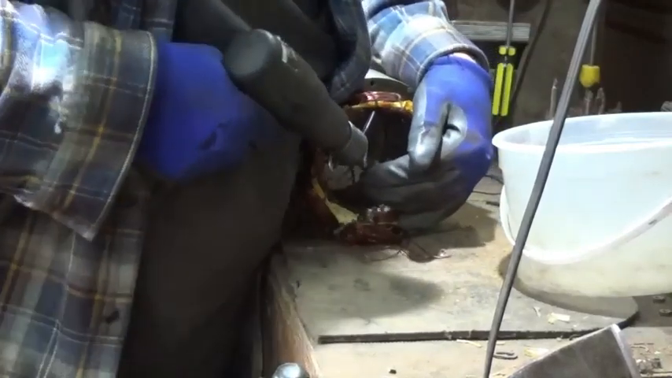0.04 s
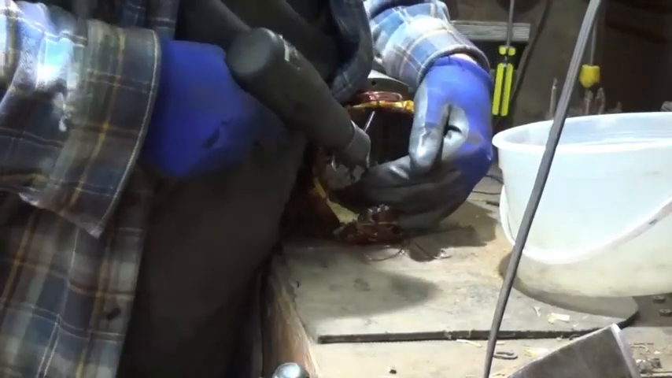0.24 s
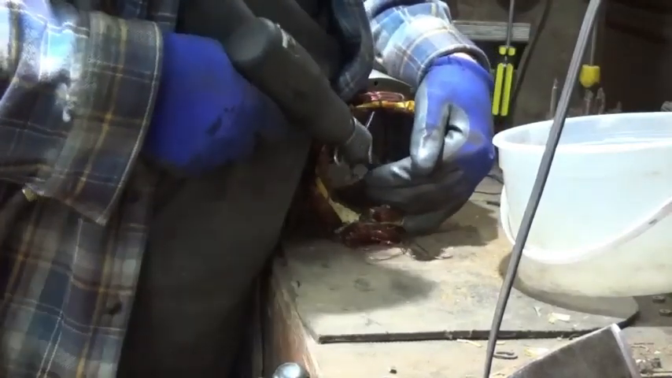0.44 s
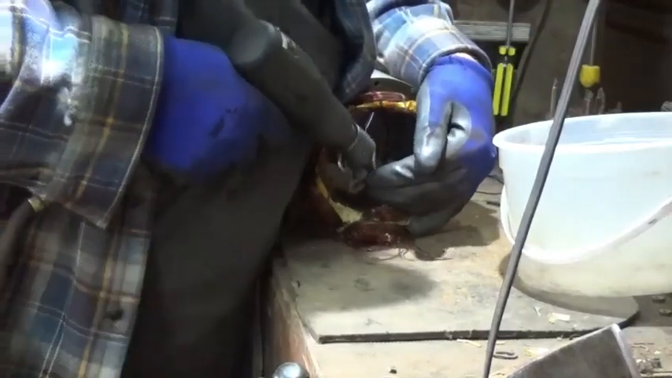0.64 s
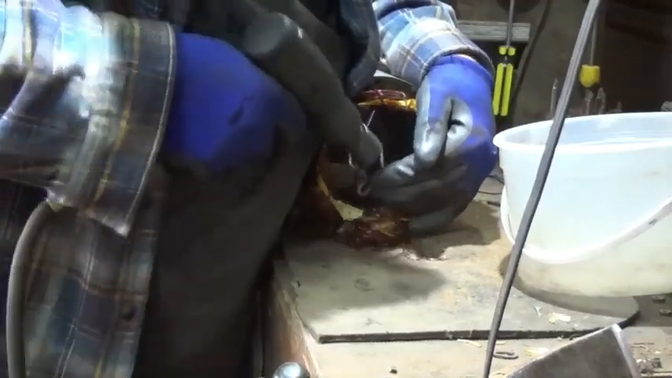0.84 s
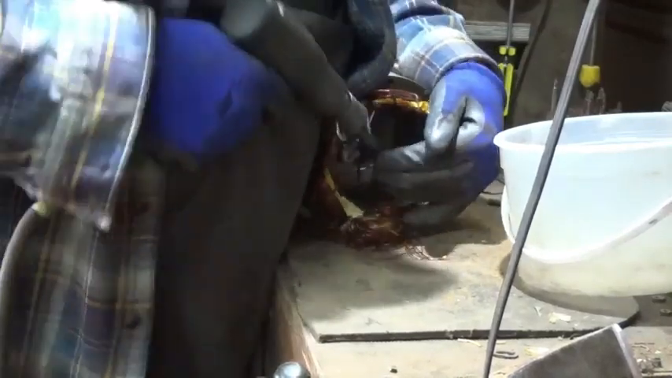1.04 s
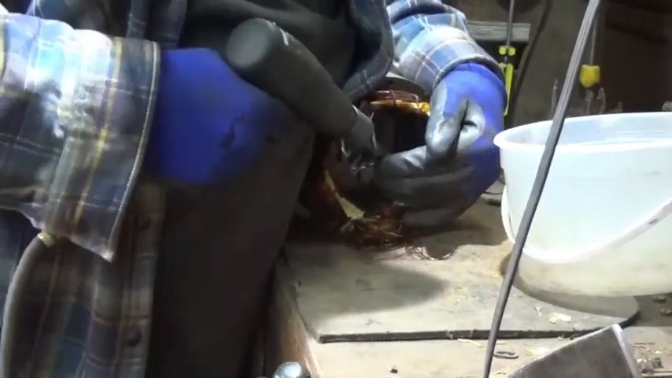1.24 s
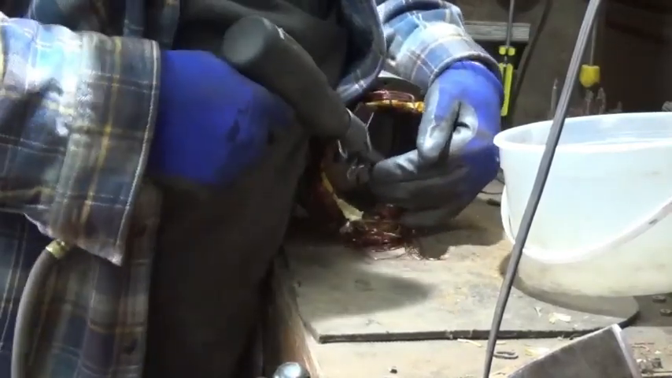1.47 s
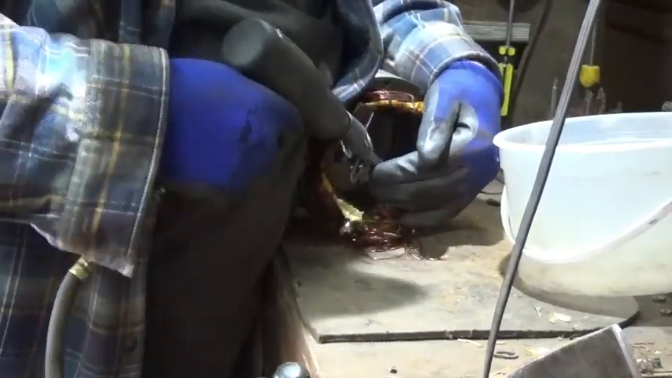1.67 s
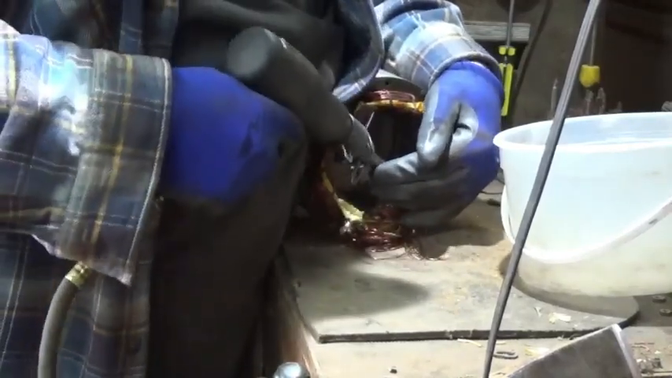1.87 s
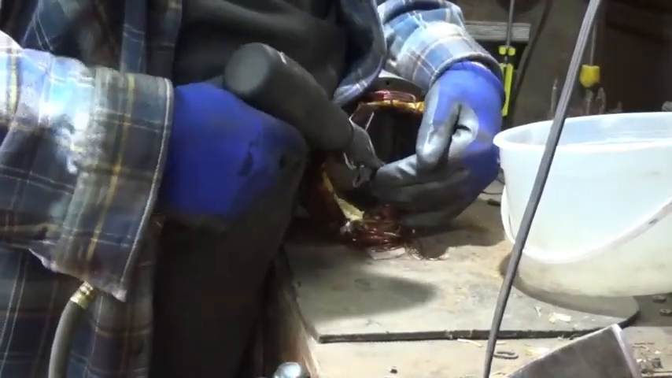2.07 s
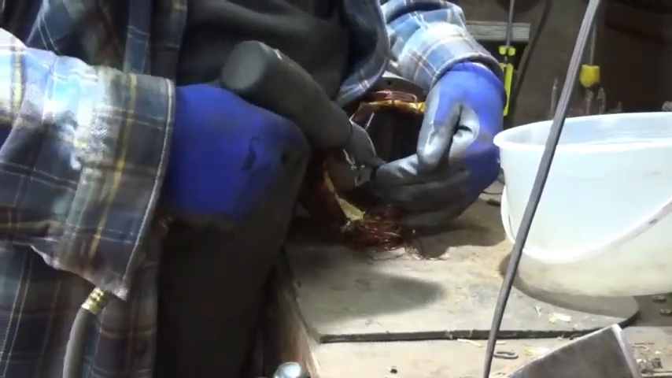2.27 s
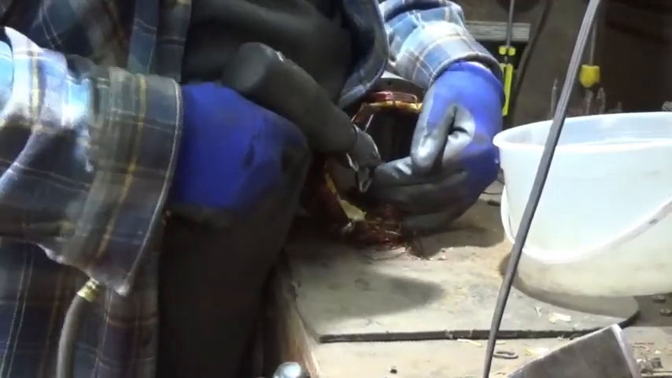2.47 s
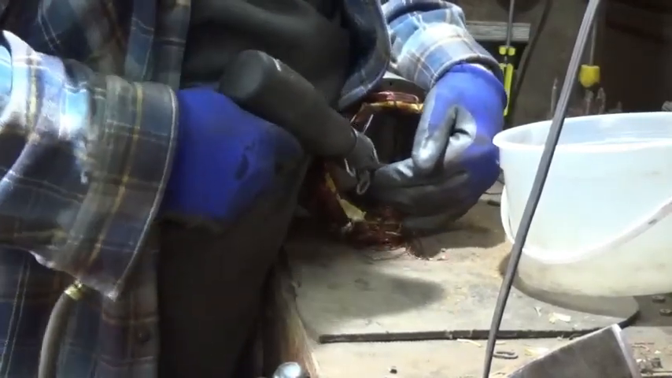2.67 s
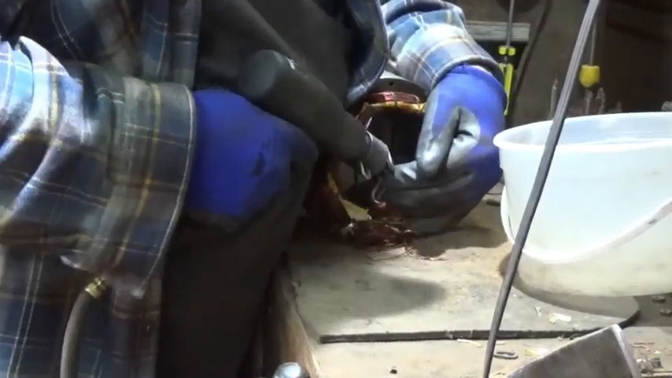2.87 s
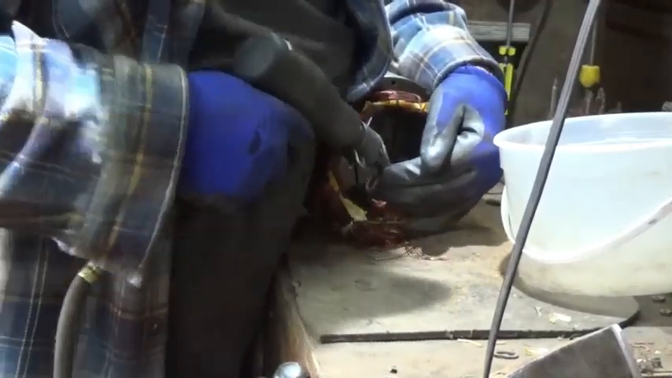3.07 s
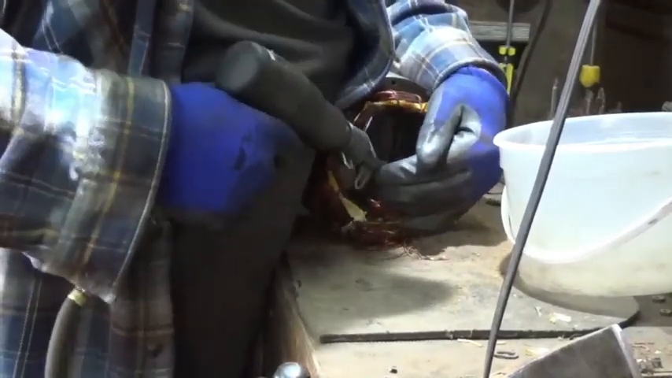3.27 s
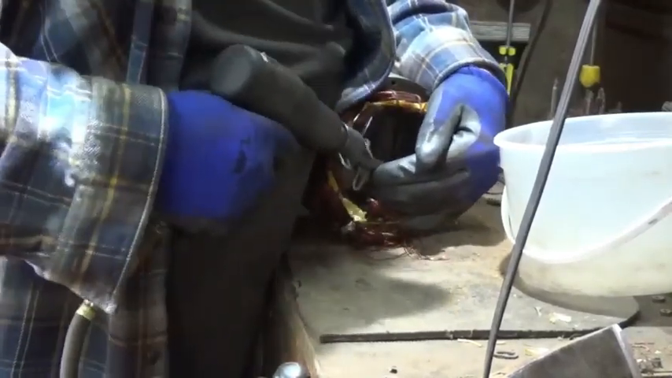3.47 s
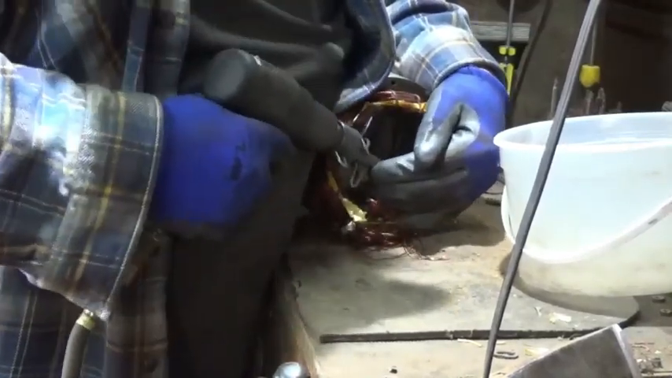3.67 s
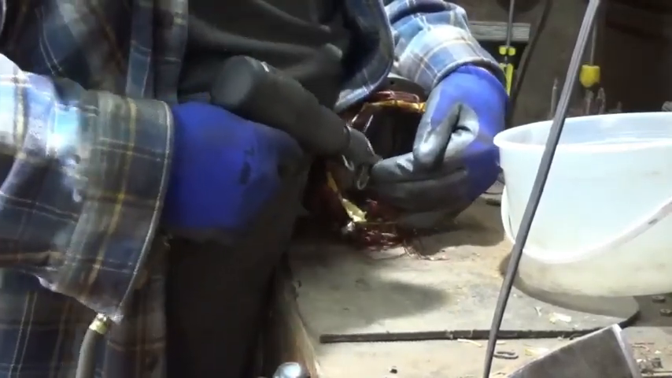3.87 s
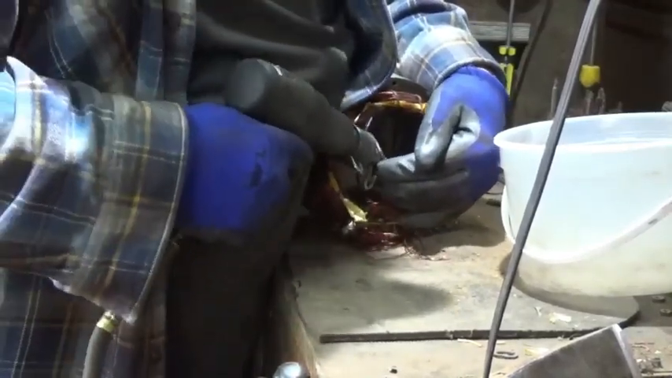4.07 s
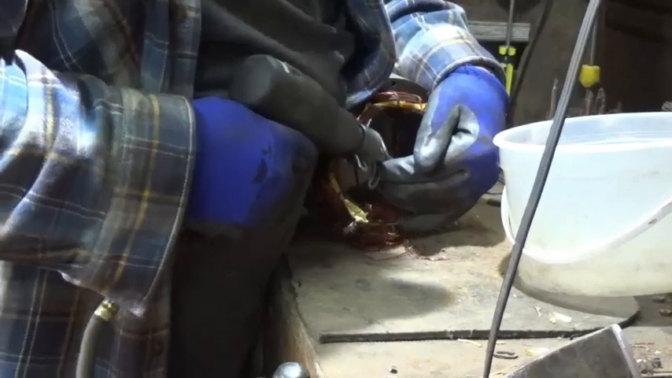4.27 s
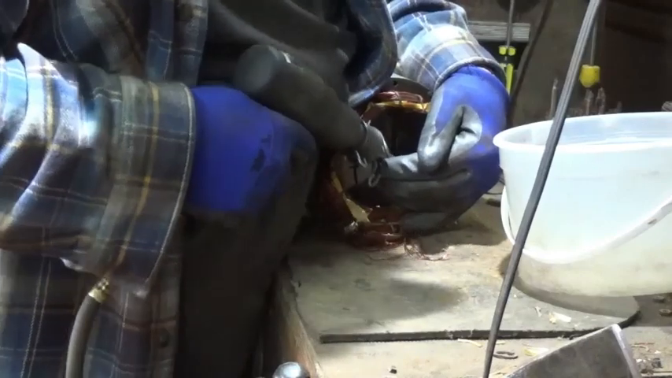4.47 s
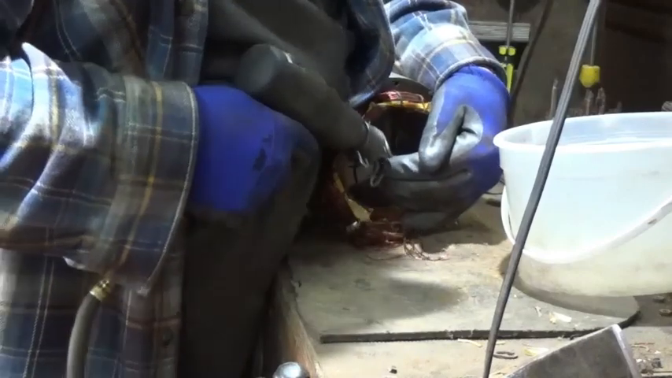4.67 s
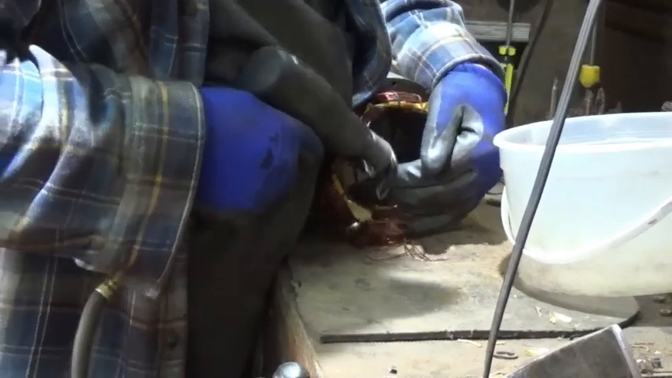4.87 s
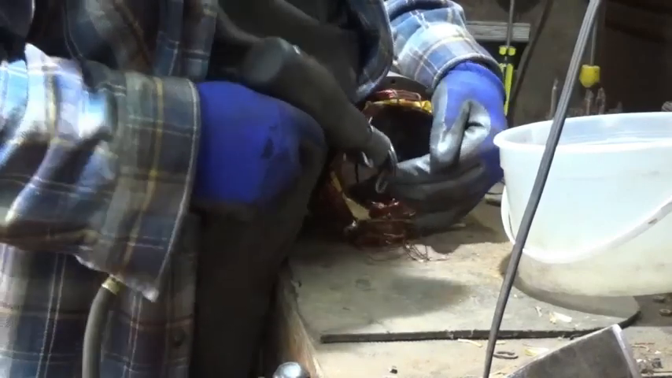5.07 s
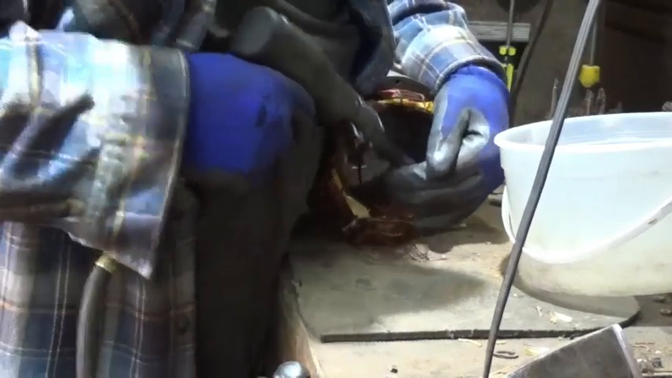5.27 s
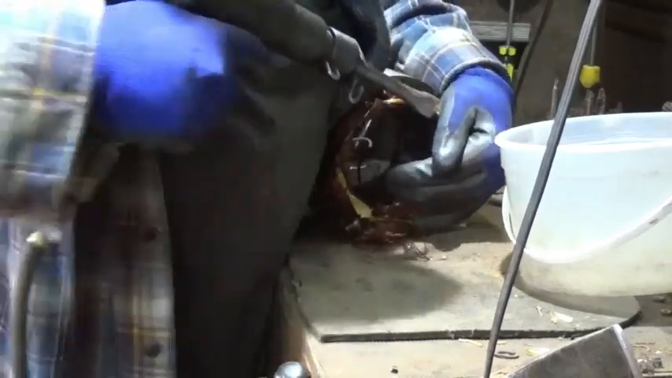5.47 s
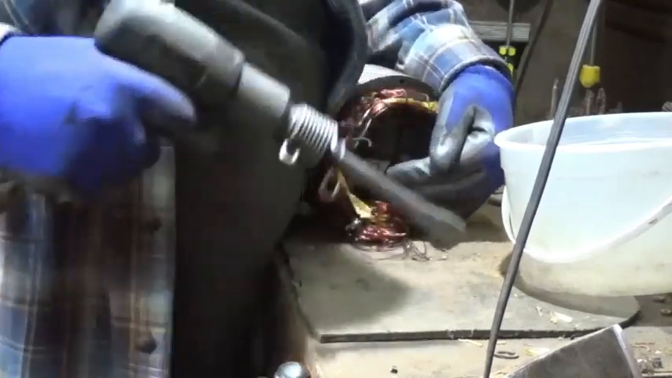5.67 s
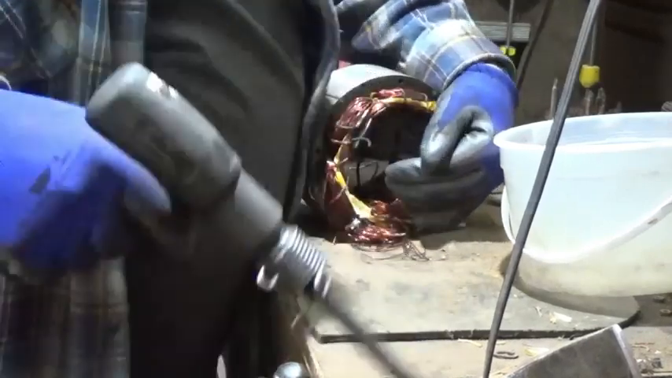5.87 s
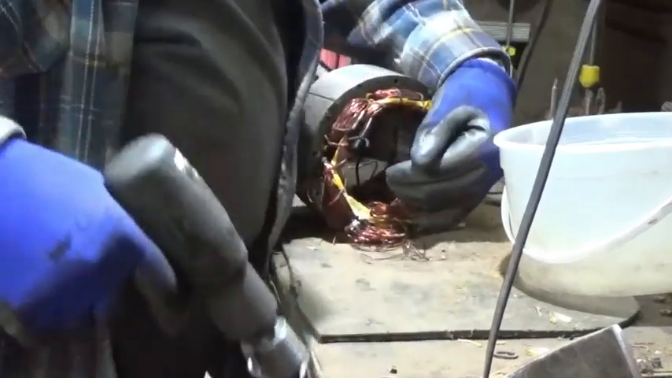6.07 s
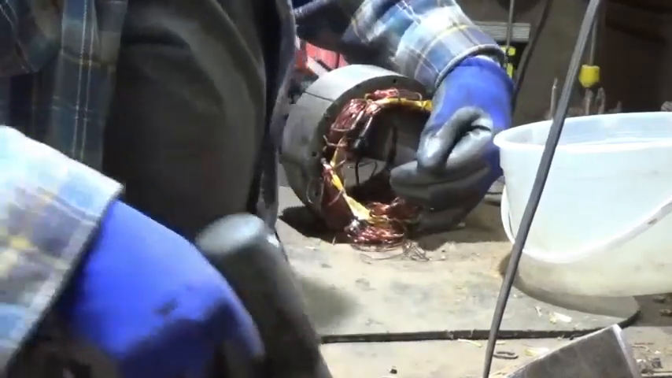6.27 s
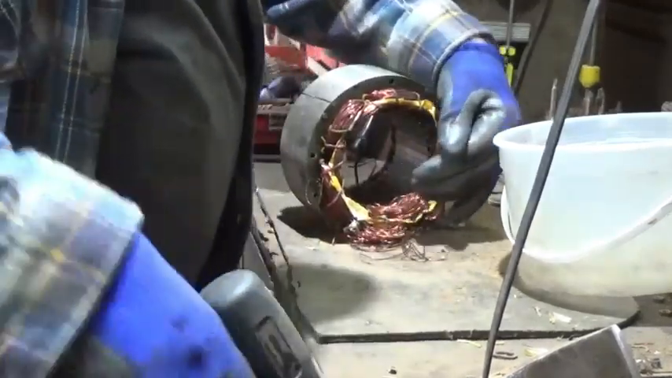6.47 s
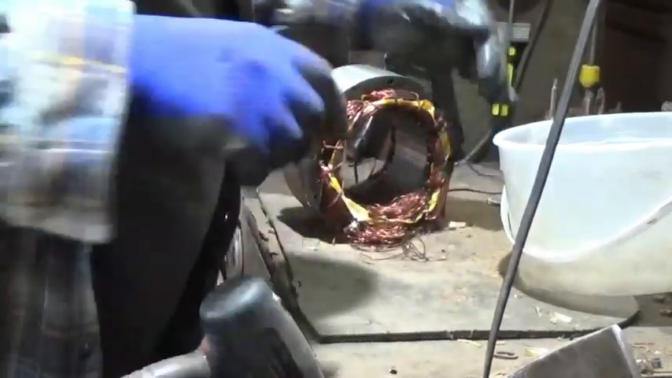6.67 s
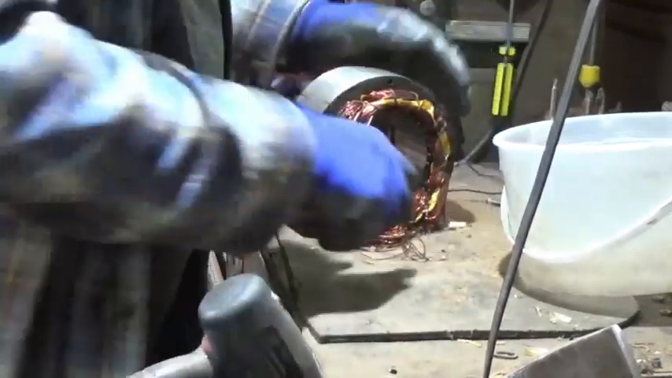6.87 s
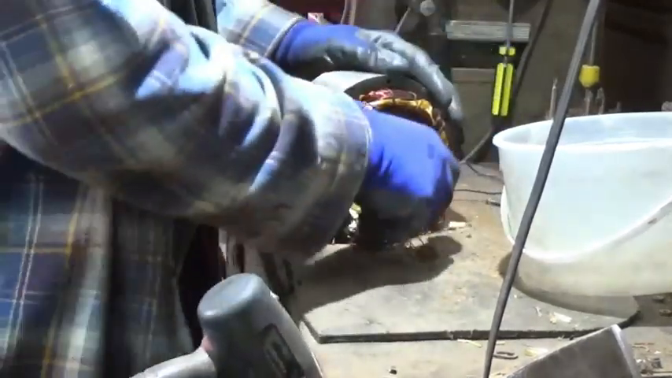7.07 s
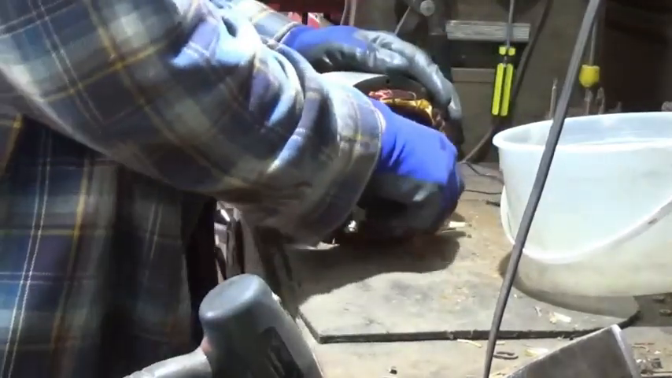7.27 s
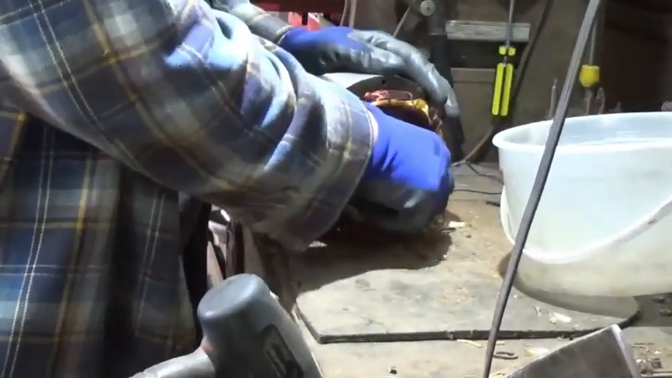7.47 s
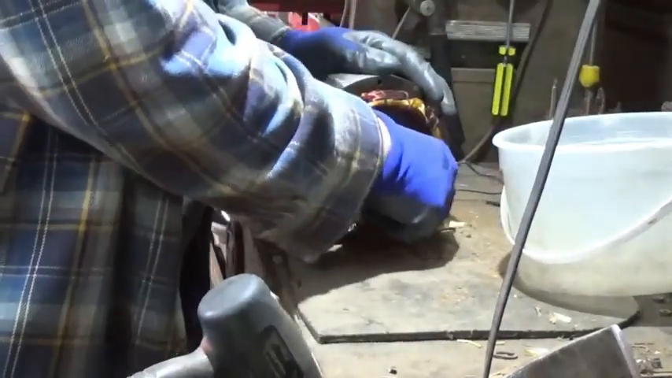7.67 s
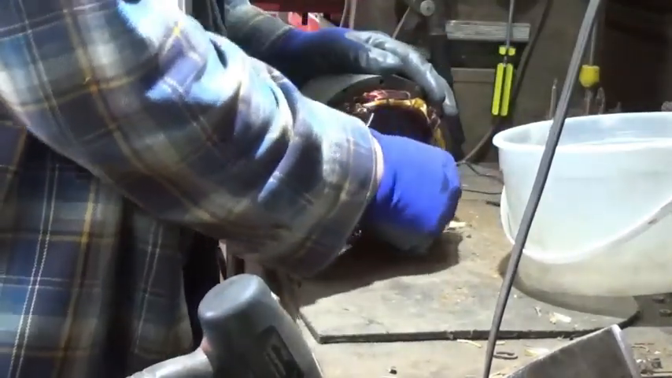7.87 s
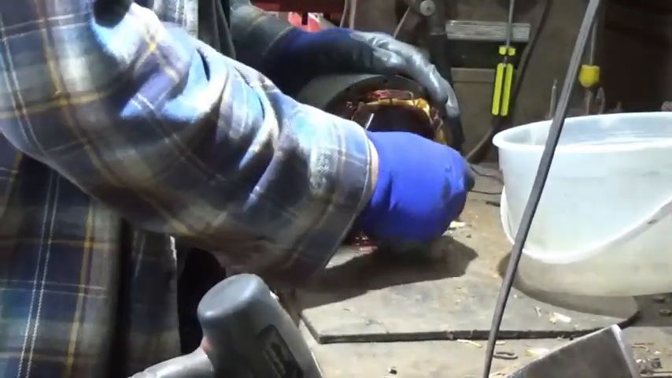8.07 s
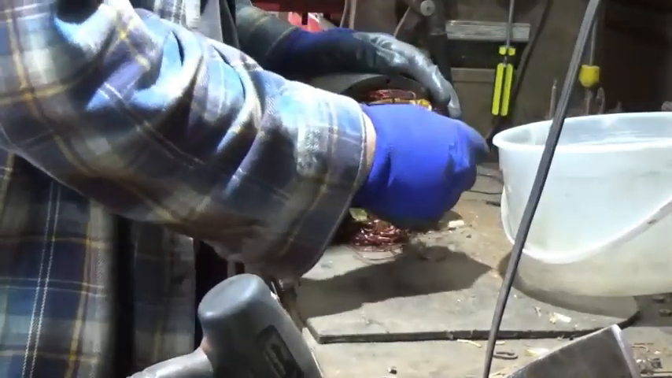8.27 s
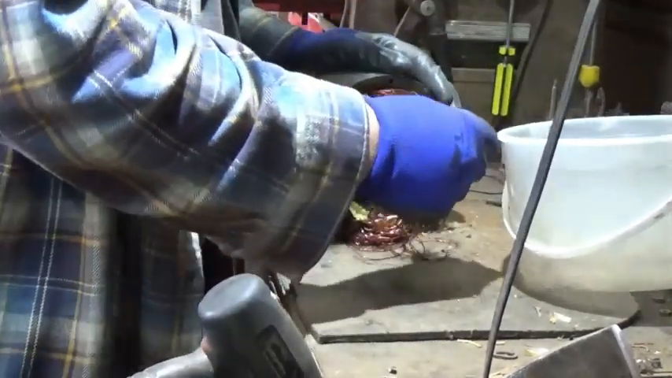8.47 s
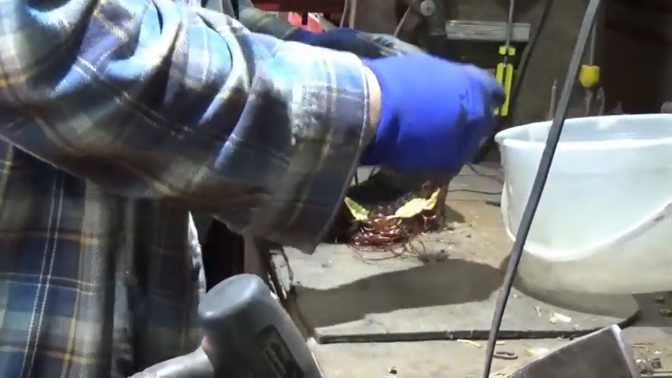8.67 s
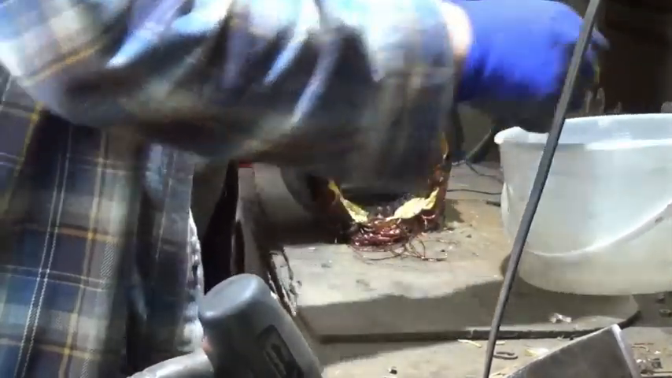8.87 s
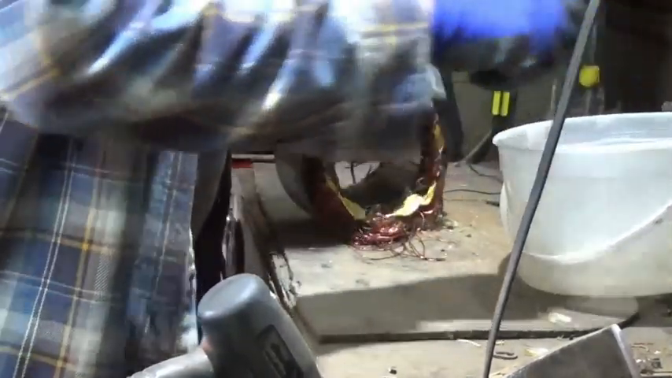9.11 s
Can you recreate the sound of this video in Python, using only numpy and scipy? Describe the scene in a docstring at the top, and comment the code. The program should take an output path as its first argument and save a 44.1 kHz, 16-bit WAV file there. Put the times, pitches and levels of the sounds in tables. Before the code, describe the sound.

An air compressor chugs rapidly in the background of a small workshop throughout, with a thin whistle, slowing very slightly. Close by, an air chisel hammers into an electric motor's copper windings, each burst a fast, ringing metallic rattle with hissing air. A blip at the very start is followed by a half-second burst from 0.2 seconds. Short bursts come at 2.7 and 4.2 seconds, and a longer, more ringing one from 4.5 to 5. Light metal ticks and jingles fall between them, the clearest at 2.3 seconds. From 6.1 to 6.4 seconds the tool is set on a wooden bench with knocks, a scrape and thuds. Wire scratches faintly as it is pulled from 7 seconds, and copper scrap lands with a light clatter at about 9. The compressor dips at each loud sound and creeps back, seeming to swell toward the end.

```python
"""Air chisel at a workbench

An air chisel cuts the copper windings out of an electric motor in five short, hissing bursts.
The tool is laid on the wooden bench, wire is pulled loose and a piece of scrap clatters.
Behind it a piston compressor chugs on, slowing as its tank fills. An automatic volume control
turns everything down at each burst and creeps back up, so the chugging seems to swell."""
import sys
import numpy as np
from scipy import signal
from scipy.fft import rfft, irfft
from scipy.io import wavfile
from scipy.ndimage import uniform_filter1d

SR = 44100
rng = np.random.default_rng(int(sys.argv[2]) if len(sys.argv) > 2 else 0)


def log_audio(samples):
    """Write samples as a 16-bit WAV file to the path given in sys.argv[1]."""
    # one column per channel
    frames = np.atleast_2d(samples).T
    # limit to full scale, then quantise
    limited = np.clip(frames, -1, 1)
    pcm = np.round(limited * 32767).astype(np.int16)
    wavfile.write(sys.argv[1], SR, pcm)


N = 403074
TIME = np.arange(N) / SR

# The room's echo. Each row: frequency in Hz, seconds to fade by 60 dB.
ECHO_FADE = [(150, 0.13), (600, 0.22), (2500, 0.3), (6000, 0.14), (11000, 0.071)]
# The compressor's main tones. Each row: multiple of its shaft speed, dB running light, dB working hard.
CHUG_TONES = [(1, -30, -23), (2, -16.5, -13), (3, -14, -16.5), (4, -6.5, -24.5), (5, -9, 3), (6, 1.5, -8.5),
              (7, -3.5, -9.5), (8, -3, -12), (9, -7, 1.5), (10, -6, -5.5), (12, -8.5, -2.5),
              (13, -4, -16.5), (14, -14, -8.5), (15, -1, -5.5), (16, -12.5, -8.5), (18, -5, -15),
              (20, -20, -14.5), (22, -16.5, -21.5), (25, -16, -6), (27, -10.5, -11), (29, -13.5, -12),
              (31, -38, -9)]
# Its motor's whine. Each row: multiple of that shaft speed, level in dB, wobble as a share of the pitch.
WHINE_TONES = [(5.718, -42, 0.00056), (6.67, -52, 0.0027), (7.78, -50.5, 0.0033), (148.4, -65.5, 0.0026),
               (154.1, -62, 0.00198), (252, -62, 0.0075)]
# Its thin whistle. Each row: time in seconds, level in dB.
WHISTLE_LEVELS = [(0, -42), (.9, -55.5), (1.45, -47), (1.9, -52), (3.6, -51), (5.5, -45), (6.8, -50.5),
                  (7.9, -47), (9.14, -55.5)]
# Its intake noise in stereo. Each row: frequency in Hz, how alike left and right are from 0 to 1.
INTAKE_LIKENESS = [(60, 0.99), (170, 1), (490, 0.86), (1410, 0.32), (4040, 0.56), (11600, 0.61)]

# Tone colours. Each row: frequency in Hz, relative level in dB.
ECHO_COLOUR = [(100, -6), (400, 2), (2000, 0.5), (5500, -1.5), (9000, 6)]  # the room's reflections
INTAKE_COLOUR = [(15, -44), (25, -25), (59, -30), (118, -22.5), (192, -8), (254, -11.5), (296, -8),
                 (381, -14), (518, -8.5), (603, -15.5), (1030, -15.5), (2160, -24), (3000, -22),
                 (8750, -34.5), (11000, -45.5), (14300, -68), (22000, -120)]  # the compressor drawing air
SCRAP_COLOUR = [(150, -40), (250, -9), (570, -6), (646, -2), (734, -16), (930, -5), (1340, -12.5),
                (1430, -15.5), (2090, -10.5), (3690, -14), (4680, -14), (6950, -18.5), (11000, -33),
                (14300, -63), (22000, -120)]  # copper landing
TICK_COLOUR = [(1000, -5), (2500, -24), (3200, -10), (4000, -4), (5000, -1.5), (6300, -1), (7500, -2.5),
               (11000, -10)]  # light touches on metal
SLIDE_COLOUR = [(710, -32), (1000, 3), (1350, -0.5), (1580, -17), (2160, 1), (2790, -4), (3000, -2),
                (3570, -10), (4600, -2), (6260, -11), (6980, -23), (9000, -12), (10500, -27), (13600, -58),
                (22000, -120)]  # the tool scraping the bench
CASING_COLOUR = [(300, -32), (600, -18), (1000, -12), (1300, -15), (1600, -10.5), (2080, -4), (2300, -10),
                 (2670, -7), (2870, -14.5), (4550, -10.5), (6090, -12), (7900, -25), (9000, -15.5),
                 (11000, -29), (14300, -64), (22000, -120)]  # its casing being knocked
BENCH_COLOUR = [(53, -41), (90, -16.5), (151, -4), (219, -7), (293, -1), (723, -4), (866, -16), (1240, -4),
                (1600, -5), (2080, -35), (3520, -120)]  # the wood thudding
HISS_COLOUR = [(530, -29), (900, -15.5), (1110, -20), (1220, -7), (1500, -15.5), (1800, -3.5),
               (2490, -13.5), (2940, -3), (3860, -10), (4380, -3.5), (5510, -2), (5990, 4), (7090, -6.5),
               (8740, -7), (11000, -13), (14300, -46), (22000, -120)]  # escaping air
PUFF_COLOUR = [(35, -46), (60, -12.5), (135, -18.5), (200, -2), (233, -15), (288, -1), (313, -7.5),
               (450, -11.5), (483, -2.5), (833, -1.5), (919, -14.5), (1100, -6.5), (1500, -23.5),
               (1700, -28), (2210, -37), (3740, -120)]  # exhaust puffs
CRACK_COLOUR = [(800, -20), (2000, -8.5), (3000, -10.5), (3800, -1.5), (4700, 8.5), (5600, 3), (7200, -3.5),
                (9000, 3.5), (11000, -9)]  # the chisel biting

# Ringing metal. Each row: pitch in Hz, relative level in dB, seconds to fade by 60 dB.
SPRING_NOTES = [(2950, -6, .05), (3090, -5, .05), (3230, -3, .05), (3369, -2, .065), (6090, 0, .08),
                (6210, 1, .08), (6400, -5, .05), (9300, -11, .04)]  # the spring that holds the chisel in
BARREL_NOTES = [(1000, -32, .08), (1335, -9, 0.072), (2025, -8, 0.049), (2180, -12, 0.055),
                (2550, -13, .04), (3760, -13, 0.065), (4450, -14, 0.094), (5300, -7, 0.045)]  # the tool's body
HOUSING_NOTES = [(1790, -12, 0.092), (1974, -10.5, 0.095), (3020, -15, 0.027), (3140, -9, 0.035),
                 (3260, -17, 0.036), (3400, -21, 0.053), (4280, -1, 0.028), (4380, -8, 0.029),
                 (4530, -9, 0.024)]  # the shell of the motor being cut
STEEL_NOTES = [(3130, -20, 0.038), (5600, -1, .03), (6013, -0.5, 0.06), (6000, -3.5, 0.1),
               (5900, -4.5, 0.07), (6051, 0.5, 0.074), (6146, -2, 0.04), (9470, -4, 0.026)]  # the chisel itself

# Rubbing moves. Each row: start, fastest moment and end in seconds, level in dB.
WIRE_PULLS = [(7.0, 7.9, 8.3, -46.5), (8.2, 9.1, 9.3, -54)]  # wire drawn from the motor's slots
TOOL_SLIDES = [(6.11, 6.13, 6.21, -33), (6.185, 6.275, 6.32, -24.5)]  # the tool sliding on the bench
# The chisel tip and loose wire touch the motor.
# Each row: time in seconds, level in dB, relative ring of the spring in dB.
LIGHT_TOUCHES = [(.857, -24, -21), (0.882, -22, -22), (1.2593, -34, -10), (1.358, -33, -18.5),
                 (2.3165, -11, -17), (2.3257, -12.5, 2), (2.328, -12.5, 1), (2.358, -18.5, -20),
                 (3.022, -29, -20), (3.04, -27, -12), (3.8501, -22, 0.5), (3.892, -24, -2), (3.912, -37, 3),
                 (5.1913, -26, 1), (5.2362, -21.5, -17), (7.5432, -26, -15)]
# The tool is set down. Each row: time in seconds, level in dB, relative wood thud and steel ring in dB.
BENCH_KNOCKS = [(6.092, -10.5, -15, 4.5), (6.1013, -5.5, -15, -22), (6.3225, -10, -0.5, -10),
                (6.326, -10, -3, -22), (6.341, -10, -0.5, -14), (6.3595, -12.5, -4, -10),
                (6.394, -23.5, -10, 3.5), (6.411, -19.5, -12, -12)]
# The exhaust opens four times a stroke. Each row: delay from the blow as a share of a stroke, level in dB.
EXHAUST_PORTS = [(-.05, -1.5), (.15, -8), (.31, -3), (.62, -2)]
# Pulls of the trigger. Each row: first and last blow in seconds, effort in dB, relative levels in dB of
# the puffs, the closing chuff and the steel's ring, then how fast that ring weakens in dB per second.
TRIGGER_PULLS = [(-0.03, 0.046, -5.5, -1, 1, -2, 0), (0.238, 0.7336, -7, -1, -1, 0.5, 53),
                 (2.659, 2.799, -8, -2, 1, -0.5, 22), (4.161, 4.28, -8.5, -1.5, 1, 2, 0),
                 (4.458, 4.955, -5.5, -2.5, -2.5, 6.5, 42)]

SLACK_DB = -3.5  # a loosely held tool hits softer


def amp(db):
    """Turn decibels into a number to multiply by."""
    return 10 ** (np.asarray(db) / 20)


def evened(x):
    """Scale a signal to an average power of 1."""
    return x / np.sqrt(np.mean(x ** 2) + 1e-20)


def read(points, hz):
    """Read between a table's rows, giving each octave equal room."""
    f, value = np.transpose(points)
    return np.interp(np.log(hz + 1), np.log(f + 1), value)


def wander(hz):
    """A smooth random wobble, up to about hz times a second."""
    smoothing = np.exp(-(np.fft.rfftfreq(N, 1 / SR) / hz) ** 2)
    return evened(irfft(rfft(rng.standard_normal(N)) * smoothing, N))


def colour(x, points, size=4096):
    """Give a sound a tone colour, with a filter that never rings before a hit."""
    log_gain = np.log(amp(read(points, abs(np.fft.fftfreq(size, 1 / SR)))))
    taps = np.fft.ifft(np.exp(np.conj(signal.hilbert(log_gain)))).real[:size // 2]
    return signal.oaconvolve(x, taps / np.linalg.norm(taps))[:N]


def resonate(x, hz, width_hz):
    """Bring out a narrow band around the moving pitch hz."""
    turn = np.exp(2j * np.pi * np.cumsum(hz) / SR)
    r = np.exp(-np.pi * width_hz / SR)
    once = signal.lfilter([1 - r], [1, -r], x / turn)
    return (turn * signal.lfilter([1 - r], [1, -r], once)).real


def impulses(times, db):
    """One sharp click at each time."""
    at, out = np.round(np.asarray(times) * SR).astype(int), np.zeros(N)
    inside = (at >= 0) & (at < N)
    np.add.at(out, at[inside], amp(db)[inside])
    return out


def contacts(times, db, decay_s):
    """Each contact is a brief crunch of noise that dies away."""
    fades = signal.lfilter([1], [1, -np.exp(-1 / (decay_s * SR))], impulses(times, db))
    return fades * rng.standard_normal(N)


def ringing(notes, times, db, scatter_db=3):
    """Struck metal rings; every blow shares its energy differently among the notes."""
    t = np.arange(SR // 5) / SR
    shares = scatter_db * rng.standard_normal((len(times), len(notes)))
    out = np.zeros(N)
    for (hz, level, fade_s), share in zip(notes, shares.T):
        note = amp(level - 60 * t / fade_s) * np.sin(2 * np.pi * hz * t)
        out += signal.oaconvolve(impulses(times, db + share), note)[:N]
    return out / 2


def room_echo(x, first_s=0.00278, echoes_per_s=3000):
    """Each ear gets its own scattered reflections; each frequency fades at its own speed."""
    taps = rng.choice([-1., 1.], (2, SR)) * (rng.random((2, SR)) < echoes_per_s / SR)
    hz, t, bands = signal.stft(taps * (TIME[:SR] > first_s), SR, nperseg=256)
    fade = amp(read(ECHO_COLOUR, hz)[:, None] - 60 * t / read(ECHO_FADE, hz)[:, None])
    tail = signal.istft(bands * fade, SR, nperseg=256)[1]
    return signal.fftconvolve(x[None], tail / np.linalg.norm(tail[0]), axes=1)[:, :N]


def chug(turns, load, count=48, weak_db=-16.5, scatter_db=6, smears=(.05, .18)):
    """Running light, the compressor gives one sharp chug a turn; load and echoes smear it out."""
    angle, k = np.linspace(0, 1, 2049), np.arange(1, count + 1)
    left, right, echo, *scatter = rng.standard_normal((count, 5)).T
    strong, *levels = np.transpose(CHUG_TONES)
    tone = np.zeros((2, N))
    for share, level, spread, smear in zip((1 - load, load), levels, scatter, smears):
        gain = amp(weak_db + scatter_db * spread) / (1 + (k / 42.3) ** 5.2)  # weak tones fill the gaps
        gain[np.round(strong).astype(int) - 1] = amp(level)
        for side, ear in enumerate((left, right)):
            phase = 2 * np.pi * np.outer(angle, k) + smear * k * echo + np.minimum(k / 60, .6) * ear
            tone[side] += share * np.interp(turns % 1, angle, evened(np.cos(phase) @ gain))
    return tone


def shaft_tone(speed, multiple, wobble, wobble_hz):
    """A slightly unsteady pure tone that follows the shaft's speed."""
    return np.sin(2 * np.pi * multiple * np.cumsum(speed * (1 + wobble * wander(wobble_hz))) / SR)


def intake(beat, pulse_depth=.15):
    """Air rushes into the compressor, pulsing once a turn, partly alike in both ears."""
    shared, apart = (rfft(colour(rng.standard_normal(N), INTAKE_COLOUR)) for _ in range(2))
    alike = np.clip(read(INTAKE_LIKENESS, np.fft.rfftfreq(N, 1 / SR)), 0, .96)
    middle = shared * np.sqrt((1 + alike) / 2)
    sides = np.outer([1, -1], apart * np.sqrt((1 - alike) / 2))
    return evened(irfft(middle + sides, N) * (1 + pulse_depth * beat) * amp(0.98 * wander(13.0)))


def compressor(empty_turns_per_s=35.65, sag_turns_per_s=1.85, fill_s=5.5):
    """It chugs, whines and whistles; the filling tank slows it and makes it work harder."""
    pressure = 1 - np.exp(-(TIME / fill_s) ** 1.2)
    speed = empty_turns_per_s - sag_turns_per_s * pressure
    load = np.interp(pressure, [0.15, 0.66], [0, 0.82])
    turns = np.cumsum(speed) / SR + .5
    beat = np.cos(2 * np.pi * turns)
    chugging = amp(-30) * chug(turns + 0.00022 * wander(9), load)
    whine = sum(amp(db) * np.sqrt(2) * shaft_tone(speed, multiple, wobble, wobble_hz=43)
                for multiple, db, wobble in WHINE_TONES)
    whistle_db = np.interp(TIME, *np.transpose(WHISTLE_LEVELS)) + wander(9.3)
    whistle = shaft_tone(speed, multiple=102.4, wobble=0.00242, wobble_hz=75.7)
    whistle *= amp(whistle_db) * (1 + .45 * beat)
    rush = amp(-38 - load) * intake(beat)
    return (chugging + whine + whistle + rush) * amp([[2.6], [1.4]])  # a little louder on the left


def rub(moves, body, slips_per_s, spread_db):
    """Rubbing is many tiny, uneven slips, louder as the move speeds up."""
    slips = (rng.random(N) < slips_per_s / SR) * rng.choice([-1, 1], N)
    sizes = amp(spread_db * np.minimum(rng.exponential(1, N), 4))
    speed = sum(amp(db) * np.interp(TIME, times, [0, 1, 0]) for *times, db in moves)
    return colour(evened(slips * sizes) * speed, body)


def falling_scrap(landing_s=8.9826, first_gap_s=.0068, gap_growth=1.21, loss_db=1.5):
    """A bundle of copper lands strand after strand, ever further apart and softer."""
    strand = np.arange(10)
    gaps = first_gap_s * gap_growth ** strand
    times = landing_s + np.cumsum(gaps) - gaps
    return colour(contacts(times, -17.5 - loss_db * strand, decay_s=0.01), SCRAP_COLOUR)


def clinks():
    """The chisel tip and loose wire tick against the motor, and the tool's spring jingles."""
    times, db, ring_db = np.transpose(LIGHT_TOUCHES)
    ticks = colour(contacts(times, db, decay_s=0.002), TICK_COLOUR)
    return ticks + ringing(SPRING_NOTES, times, db + ring_db - 2.5)


def tool_set_down():
    """The casing knocks on the bench: the metal rings and the wood thuds."""
    times, db, thud_db, ring_db = np.transpose(BENCH_KNOCKS)
    knocks = colour(contacts(times, db, decay_s=0.0035), CASING_COLOUR)
    metal = ringing(BARREL_NOTES, times, db) + ringing(STEEL_NOTES, times, db + ring_db - 6.5)
    thuds = colour(contacts(times, db + thud_db - 4.5, decay_s=0.0095), BENCH_COLOUR)
    return knocks + metal + thuds


def strokes(first, last, blows_per_s=40.5):
    """The times of the piston's blows in one burst."""
    return np.linspace(first, last, round((last - first) * blows_per_s) + 1)


def grip(t, first, last, press_s=.05, ease_s=0.16):
    """The hand leans in, then eases off before the last blow: 0 is slack, 1 is firm."""
    return np.clip((t - first) / press_s, 0, 1) * np.clip((last - t) / ease_s, 0, 1)


def run_down(after, peak_s=0.034):
    """With the pressure gone, the piston's flutter sinks in pitch: one short chuff."""
    span = (after > 0) & (after < .2)
    age = after[span] / peak_s
    flutter = resonate(rng.standard_normal(len(age)), hz=210 + 520 * np.exp(-age), width_hz=216)
    chuff = np.zeros(N)
    chuff[span] = age * np.exp((1 - age ** 2) / 2) * evened(flutter)
    return chuff


def exhaust(lead_s=0.012, leak_db=-7, bleed_s=0.009, fall_db_per_s=220, spin_up_s=0.023):
    """Air hisses and puffs from the tool; on release the hose empties and the piston runs down."""
    hiss, gusts, puffs, chuffs = np.zeros((4, N))
    for first, last, effort_db, puff_db, chuff_db, *_ in TRIGGER_PULLS:
        blows, firm = strokes(first, last), grip(TIME, first, last)
        since, after = TIME - first, np.maximum(TIME - last, 0)
        effort = amp(effort_db + SLACK_DB * (1 - firm))
        rough = 0.96 - 0.63 * firm  # a firm grip steadies the piston
        valve_db = leak_db * (since < 0) - fall_db_per_s * np.clip(after - bleed_s, 0, 1)
        # the piston chokes the air just before each blow
        stroke = np.interp(TIME, blows, np.arange(len(blows)))
        throb = 1 + 0.26 * np.sin(2 * np.pi * (stroke - .12)) * (after == 0)
        flow = effort * (since > -lead_s) * amp(valve_db) * throb
        hiss += flow
        # gusts and puffs build as the piston gets going
        running = np.clip(since / spin_up_s, 0, 1)
        gusts += flow * rough * running
        for share, port_db in EXHAUST_PORTS:
            late, force = rng.standard_normal((len(blows) - 1, 2)).T * np.interp(blows[1:], TIME, rough)
            times = blows[1:] + share / 40.5 + .0003 * late  # 40.5 strokes a second
            pops = impulses(times, puff_db + port_db + 5.8 * force)
            puffs += effort * running * (1 - 2 / 3 * rough) * pops
        chuffs += effort * amp(chuff_db) * run_down(after)
    turbulence = rng.standard_normal(N)
    high_air = amp(-4) * colour(hiss * turbulence, HISS_COLOUR)
    low_air = colour(amp(22.5) * puffs + amp(-11) * gusts * turbulence, PUFF_COLOUR)
    return high_air + low_air + amp(-12) * chuffs


def chisel(rebound_s=0.012, rebound_db=-4, seat_s=0.09, unseated_db=-4):
    """The piston strikes the chisel, which bounces and strikes the motor once more."""
    hits = []
    for first, last, effort_db, _, _, steel_db, damping in TRIGGER_PULLS:
        blows = strokes(first, last)
        jitter, force, delay, bounce = rng.standard_normal((len(blows), 4)).T
        times = np.r_[blows + .0003 * jitter, blows + rebound_s * (1 + .25 * delay)]
        db = effort_db + SLACK_DB * (1 - grip(times, first, last))
        db += np.r_[.8 * force, rebound_db + 2.5 * bounce]
        # the steel rings fully once the tip is seated, until it sinks into the copper
        seated = times - first - seat_s
        ring_db = steel_db + np.where(seated < 0, -unseated_db * seated / seat_s, -damping * seated)
        hits.append([times, db, ring_db])
    times, db, ring_db = np.hstack(hits)
    crack_db = db + 2.5 - 0.23 * ring_db  # the less a blow rings, the more it cracks
    crack = colour(contacts(times, crack_db, decay_s=.0028), CRACK_COLOUR)
    return crack + ringing(STEEL_NOTES, times, db + ring_db - 2) + ringing(HOUSING_NOTES, times, db - 4)


def scene(tool_echo_db=-5.5, bench_echo_db=-6.0):
    """Tool and bench close in front, the compressor farther off."""
    tool = chisel() + exhaust()
    bench = clinks() + tool_set_down() + falling_scrap()
    bench += rub(TOOL_SLIDES, SLIDE_COLOUR, slips_per_s=3200, spread_db=0.5)
    bench += rub(WIRE_PULLS, TICK_COLOUR, slips_per_s=560, spread_db=5)
    echo = room_echo(amp(tool_echo_db) * tool + amp(bench_echo_db) * bench)
    return tool + bench + echo + compressor()


def record(dry, limit_db=-16.5, recover_db_per_s=3.0, top_hz=11180):
    """The volume drops at once on loud sound and creeps back; the highest treble is cut."""
    power_db = 10 * np.log10(abs(uniform_filter1d((dry ** 2).mean(0), size=1400)) + 1e-12)
    creep = TIME * recover_db_per_s
    over_db = np.maximum(np.maximum.accumulate(power_db + creep) - creep - limit_db, 0)
    ducked = dry / amp(uniform_filter1d(over_db, size=200))
    rounded = 0.71 * np.tanh(ducked / 0.69)  # softens the tallest peaks
    treble_cut = signal.firwin(511, top_hz, window=("kaiser", 8), fs=SR)
    return signal.oaconvolve(rounded, treble_cut[None], "same")


dry = scene()
out = record(dry)
log_audio(out)
```